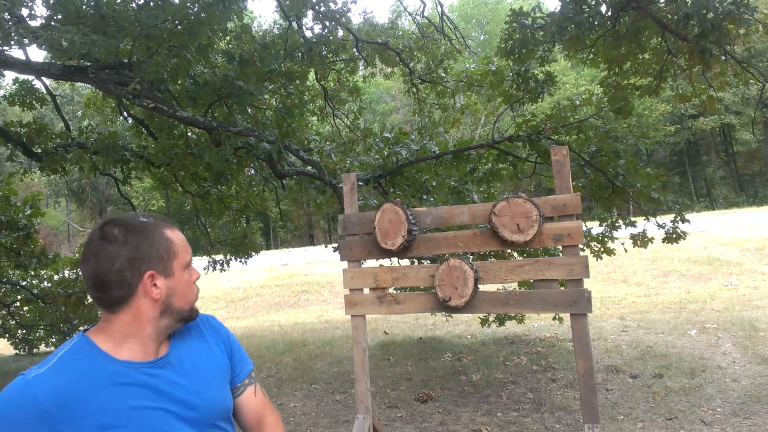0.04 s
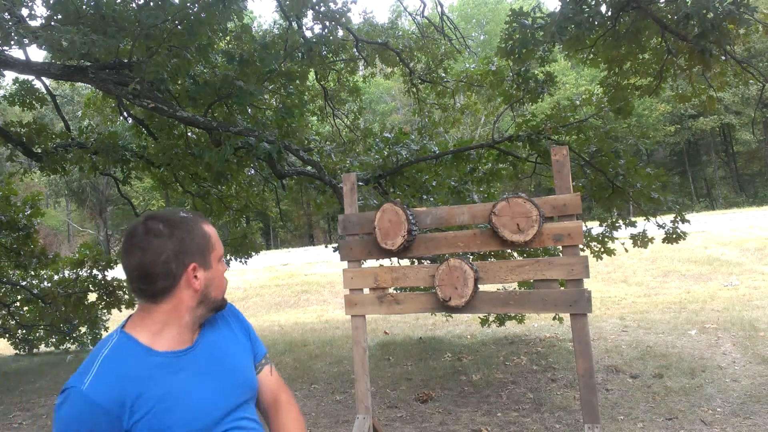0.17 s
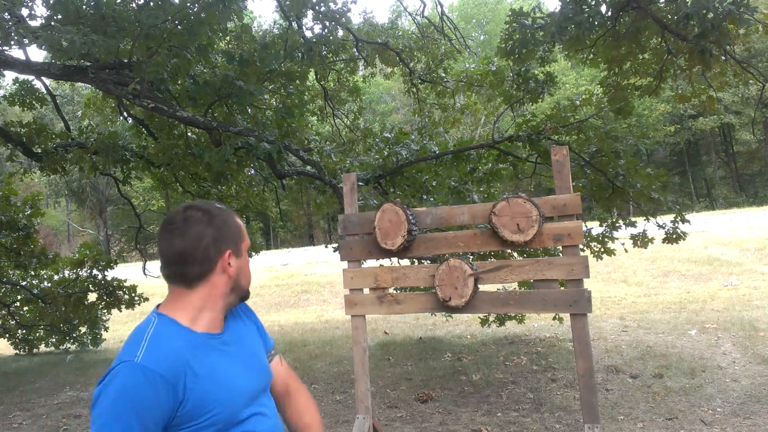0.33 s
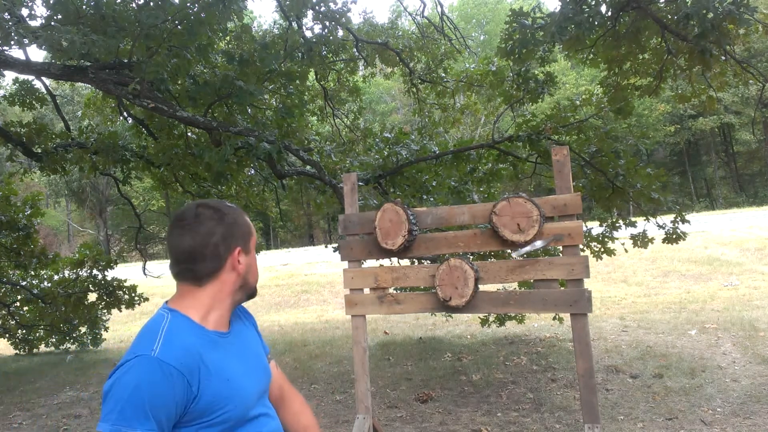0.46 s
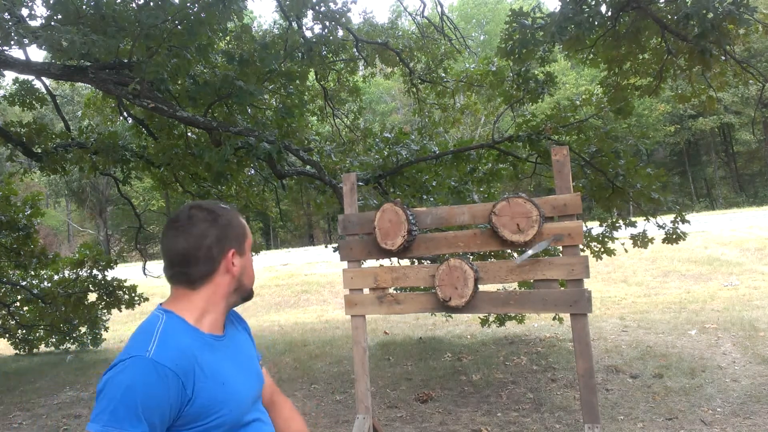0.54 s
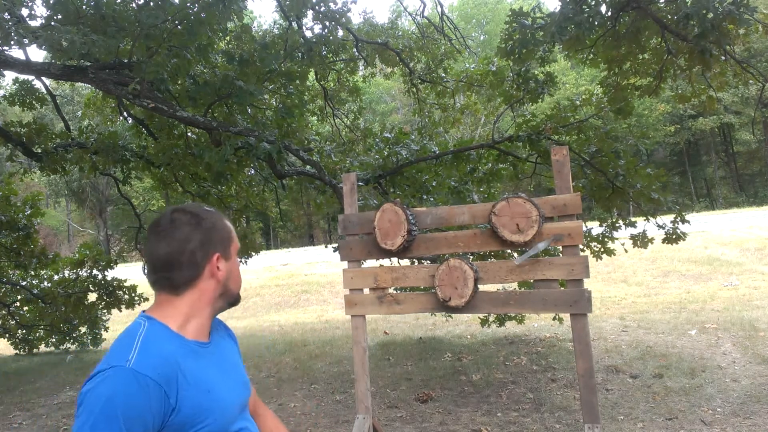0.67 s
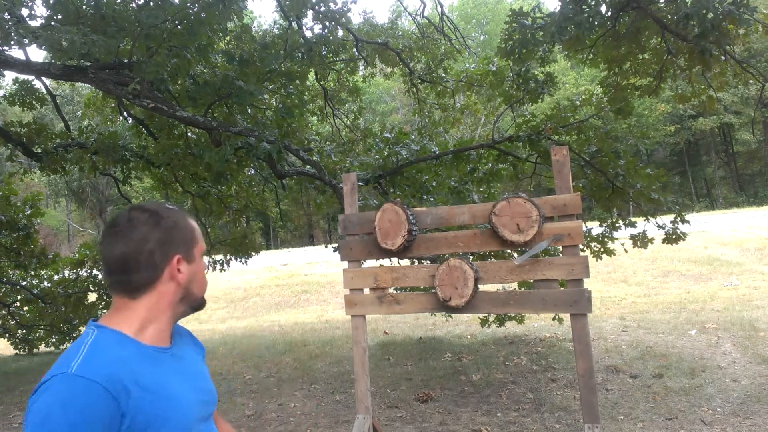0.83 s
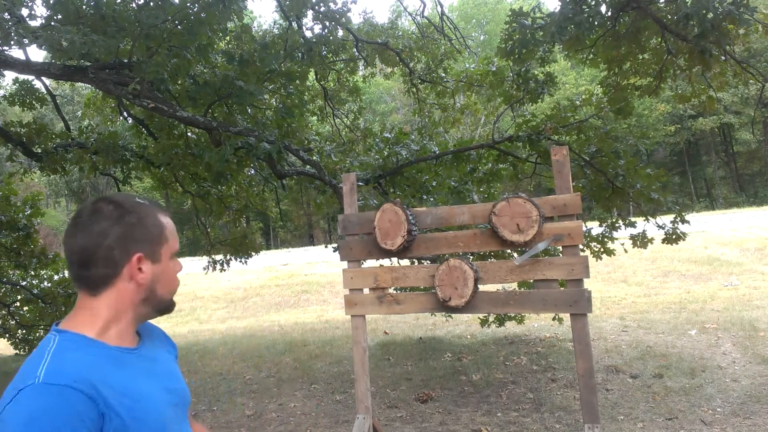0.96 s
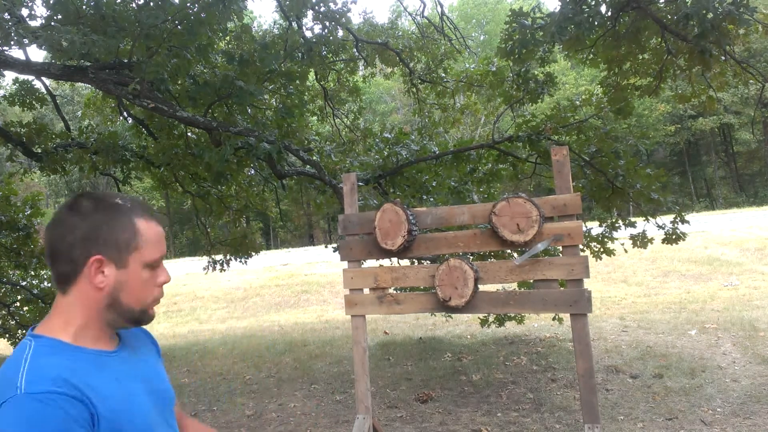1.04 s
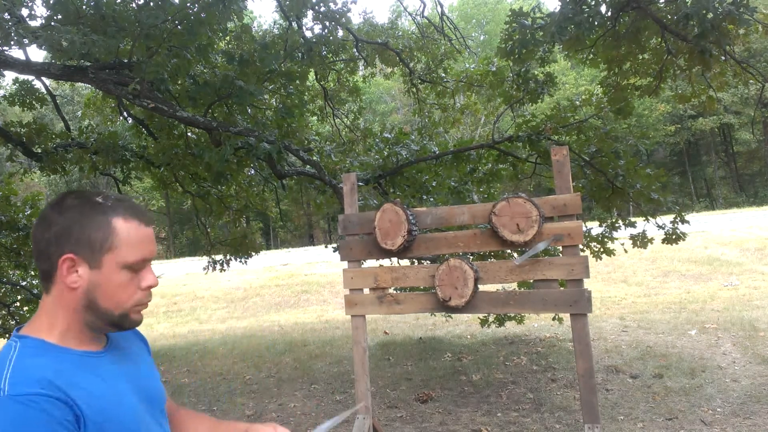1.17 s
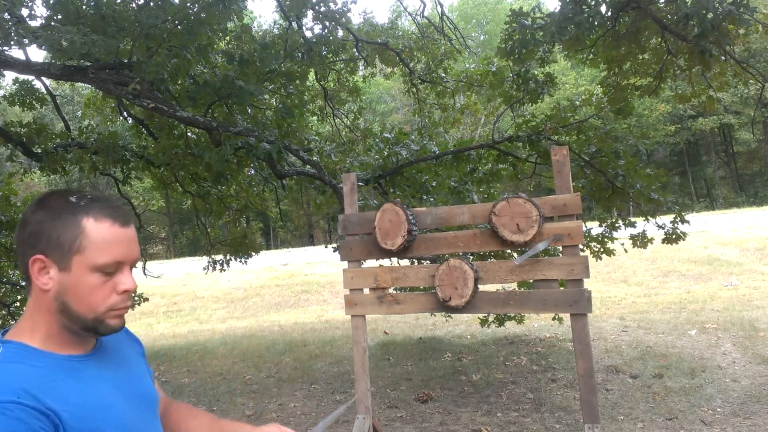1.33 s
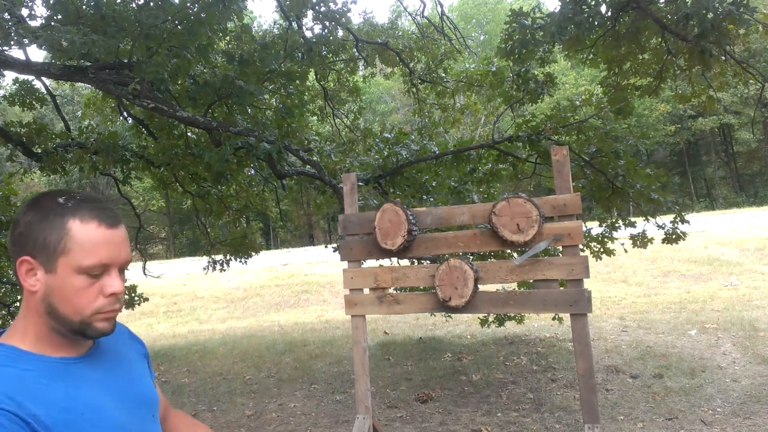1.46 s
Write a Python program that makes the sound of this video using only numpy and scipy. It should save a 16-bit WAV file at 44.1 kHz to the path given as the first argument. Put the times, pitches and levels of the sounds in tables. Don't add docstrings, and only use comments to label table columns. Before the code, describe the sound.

Outdoors in a quiet clearing, a steel knife bites into boards with a sharp woody crack, faint quiver and dull echo from trees. After a tiny handle tick, a blade scrapes against others close up, ringing briefly.

```python
import sys
import numpy as np
from scipy import signal
from scipy.fft import rfft, irfft
from scipy.io import wavfile
from scipy.ndimage import uniform_filter1d

SR = 44100
rng = np.random.default_rng(int(sys.argv[2]) if len(sys.argv) > 2 else 0)


def elevation(decibels):
    levels = np.asarray(decibels, float)
    return 10 ** (levels / 20)


def file_out(sig):
    cols = np.atleast_2d(sig).T
    lim = np.clip(cols, -1, 1)
    pcm = np.round(lim * 32767).astype(np.int16)
    wavfile.write(sys.argv[1], SR, pcm)


N = 66150
t = np.arange(N) / SR

# [f/Hz, level/dB]
AIR_COLOUR = [(45, -13), (90, -2), (250, -7), (800, -14.5), (2500, -18), (4700, -14), (6300, -19),
              (8000, -37)]
AIR_DB = -65
# [f/Hz, level/dB]
CLOTH_STIR = [(0, -61), (.1, -66.5), (.2, -83), (.36, -63.5), (.41, -56.5), (.5, -72.5), (.65, -91.5),
              (.72, -66.5), (.85, -65.5), (1.05, -66), (1.18, -74), (1.5, -87.5)]
CLOTH_COLOUR = [(1000, -1), (4000, 0.5), (7000, -3), (10500, -7)]
# [t/s, level/dB]
MOTOR_COLOUR = [(50, -21.5), (80, 2), (130, -13), (200, -23), (240, -6.5), (300, -33)]
MOTOR_PASSING = [
    (0, -91.5),
    (.6, -84),
    (1., -65.5),
    (1.3, -77),
    (1.5, -80),
]
# [t/s, f/Hz, level/dB, t60/s, lag/rad]
ARM_BUMP = (-0.5, 69, -60, 0.57, 3.43)
# [f/Hz, level/dB, t60/s, right-port lag/rad, swell/s]
EARLIER_RING = [(4404, -55.5, 0.091, 3.1, .003), (3987, -54.5, 0.2, 1.5, 0.038),
                (7660, -55, 0.44, .5, 0.11), (8106, -60.5, 0.093, 0.67, 0.0061),
                (9220, -65.5, 0.5, 1.3, 0.0033), (860, -53, 0.0555, 1.64, 0.00477),
                (3670, -61.5, .2, 1.2, .04), (5840, -64.5, .4, 1.1, .08), (2760, -58.5, 0.074, 1.6, 0.0068)]

HIT_S = .2250
# [delay/s, level/dB]
BLOWS = [
    (.0016, -10),
    (.0030, -1.5),
    (.0056, 1),
    (.0082, -5),
    (0.0113, -5.5),
    (0.019, -13.5),
    (.0365, -9),
    (0.044, -10),
]
SOFTER_DB = 72.5
# [f/Hz, level/dB, t60/s,
# lag/rad]
TARGET_MODES = [(121.5, -49, 0.27, 2.2), (247.8, -23, 0.034, 2.69), (321.3, -15, 0.03, 3.094),
                (460, -34.5, 0.31, 2.63), (602.8, -30.5, 0.097, 2.394), (750, -23.5, 0.023, 3.267),
                (982, -27, 0.019, 2.3), (1215, -24, 0.0978, 1.56), (1426.5, -20, 0.052, 2.2),
                (1761, -14.5, 0.0261, 1.712), (2079, -17.5, 0.044, 2.407), (2398.6, -20, 0.07, 2.126),
                (2947, -29, 0.04, 3.7), (3332.3, -17, 0.03, 1.3), (3920, -28.5, 0.017, 0.86),
                (4137, -21.5, 0.032, 0.72), (4534, -9.5, 0.025, 0.35), (81.3, -45.5, .12, .9)]
TIP_IN_GRAIN = [(7229, -49.5, 0.033, -0.77), (8684, -40, 0.015, -0.68), (9630, -47, 0.02, -1.2),
                (5806, -49, 0.042, 1.5)]
STUCK_KNIFE = [(1210, -52.5, 1, 2.137), (1611.6, -53, 0.685, 1.2), (1790.5, -53.5, 0.58, 1.9),
               (2440, -48, 0.31, 2.4), (3431.7, -52, 0.766, .8), (4580, -46, 0.3, 1.9),
               (3360, -49, 0.15, 1.1)]
QUIVER_DB, QUIVER_RAD = 4, 1.1
# [f/Hz, t60/s]
NEAR_COLOUR = [(80, -27.5), (350, 1.5), (1200, -1), (2400, -3), (3900, -10.5), (4600, -13), (6500, -20.5),
               (10500, -27)]
NEAR_T60 = [(100, 0.38), (400, 0.245), (1000, 0.2183), (4000, 0.1884), (10000, 0.25)]
NEAR_DB, NEAR_RISE_S = -21, 0.0018
# [f/Hz, t60/s]
WOODS_COLOUR = [(80, -11), (400, -15.5), (1200, -5.5), (1700, -2), (2400, -6), (3400, -5), (5000, -13.5),
                (7000, -32.5), (10500, -43.5)]
WOODS_T60 = [(100, 0.96), (1500, 1.491), (4000, 0.65), (10000, .5)]
WOODS_DB, WOODS_RISE_S = -46.5, 0.032
LOW_CUT_HZ = 70

# [f/Hz, level/dB]
TICK_COLOUR = [(600, -8), (1100, -7), (3100, -5.5), (4500, 4), (6000, -3.5), (8500, -3.5), (10500, -4.5)]
TICK_S, TICK_DB = .7265, -48.5

# [t/s, level/dB]
DRAW_PRESSURE = [
    (.80, -40.5),
    (.876, -17),
    (.889, 0.5),
    (.903, 2.5),
    (.925, -2),
    (.94, -16.5),
    (.97, -21.5),
    (1.03, -25),
    (1.1, -41.5),
]
# [f/Hz, level/dB]
GRIT_COLOUR = [(1400, -39.5), (1900, -7.5), (3000, 2), (4600, 0), (6000, 3.5), (7500, 0), (9300, 3),
               (10600, -9)]
GRIT_DB, GRIT_DULL_S = -42.5, 0.00558
# [f/Hz, level/dB, t60/s, lag/rad]
OTHER_KNIVES = [(2340, -88, 0.026, -2.5), (3253.5, -87.5, 0.017, -1.05), (4174, -72.5, 0.048, 1.34),
                (5376, -74, 0.033, 1.5), (6140, -66.5, 0.046, 3.5), (8044, -71, 0.046, 0),
                (8420, -73.5, 0.03, -0.02), (9210, -73.5, 0.039, -1.25), (10082, -68, 0.042, -1.5)]
# [f/Hz, draw level/dB, brush level/dB, t60/s, lag/rad, sway phase/rad]
DRAWN_KNIFE = [(1289, -82.5, -66.5, .4, -1.5, 2), (1877.3, -48.5, -90.5, 0.066, -2, 1),
               (2003, -73.5, -76, 0.54, -2.01, 0.35), (2902.6, -55, -43.5, 0.2253, 0.6429, 4.5),
               (3740.4, -50.5, -74.5, 0.089, 1.1, 0.2), (4020, -66.5, -60, 0.23, 7.5, 0.78),
               (4363.7, -53.5, -46, 0.34, 1.5, 0.23), (4904, -53, -65.5, 0.191, 4, 1.62),
               (5080, -57.5, -63, 0.31, 4.5, 5.5), (6587, -49.5, -70.5, 0.2768, 4.5, -0.06),
               (7332, -63, -68.5, 0.31, 5, 1.76), (8134, -48.5, -61.5, .22, 3, 2.5),
               (9017, -52.5, -58.5, 0.17, 0.5, -2), (9792, -54.5, -52, 0.19, -1.5, -1.07),
               (4255, -56, -66, 0.11, -2.5, .3), (5980, -65.5, -59, .12, 8, 1.1),
               (6260, -59, -77.5, .12, 4.5, .4), (7650, -63, -77.5, .12, -1.98, 2.4),
               (9292, -60.5, -75, 0.089, -6.77, 1.3), (10340, -56, -78.5, 0.14, 2.22, .6)]
ROUGH = .012
BRUSH_S, BRUSH_RISE_S, BRUSH_FALL_S = 1.010, 0.00731, 0.0052
# [f/Hz, split/Hz]
MODE_SPLIT = [(2904, 6), (4362, 27), (5066, 22), (6590, 14.5), (8110, 25), (9049, 18), (9792, 30)]
SWAY_DEPTH, PORT_SWAY_RAD = .85, .3
# [f/Hz, loss/dB]
FINGER_GRIP = [(3000, -0.27), (4030, -2.5), (4362, 24.5), (5066, 5.5), (6590, 2), (7332, 10), (9049, 8),
               (9792, 8)]
GRIP_S = 1.02
# [t/s, f/Hz, level/dB, t60/s, lag/rad]
EDGE_NICKS = [
    (0.8712, 2830, -53, 0.075, 1.07),
    (0.8902, 9230, -32.5, 0.062, 2.63),
    (0.8994, 9390, -34.5, 0.033, -1.14),
    (0.8998, 9860, -32.5, 0.025, 1.26),
    (0.908, 6500, -32, 0.042, 6.5),
    (0.918, 4900, -28, 0.039, -6),
    (.922, 2900, -35.5, 0.076, 0.54),
    (.927, 3780, -38, 0.0765, 0.68),
    (.938, 8100, -54, .08, -1.4),
]

# [f/Hz, correlation]
LIKE_HIT = [(60, -.1), (260, -.9), (700, -.75), (2400, -.3), (5000, .1), (8500, .5)]
LIKE_AIR = [(60, -0.45), (260, -.3), (1000, 0.09), (8000, -0.03)]
LIKE_TICK = [(100, 0.43), (8000, 0.41)]
# [f/Hz, level/dB]
NEAR_PORTS = [(60, 0), (400, 1.8453), (2400, -3), (3500, 4.5), (4800, 9.5), (6200, 5), (7200, -10),
              (10500, -5.5)]
AIR_PORTS = [(100, 3.0), (500, -3.5), (2500, -1.0), (4800, 8.0), (7500, 5.5), (10000, 6.0)]
TOP_HZ = 10620


def on_hz(table, hz):
    f, value = np.array(table).T
    return np.interp(np.log(hz + 1), np.log(f), value)


def on_t(table):
    return np.interp(t, *np.array(table).T)


def walk(rate):
    k = int(SR / rate)
    steps = np.repeat(rng.standard_normal(N // k + 1), k)
    return 1.64 * uniform_filter1d(uniform_filter1d(steps, k), k)[:N]


def bands(colour, like, shape, grain_db=0.):
    hz = np.fft.rfftfreq(N, 1 / SR)
    raw = rng.standard_normal((2, N)) * elevation(grain_db * rng.exponential(size=N))
    c = np.clip(on_hz(like, hz), -1, 1)
    mid, side = rfft(raw) * elevation(on_hz(colour, hz)) * np.sqrt([1 + c, 1 - c])
    spec = np.array([mid + side, mid - side])
    spec = spec * N / np.sqrt(2 * np.sum(np.abs(spec[0]) ** 2))
    place = 2 * np.log2(hz / 30 + 1e-9)
    first = int(2 * np.log2(colour[0][0] / 30))
    last = min(int(2 * np.log2(colour[-1][0] / 30)) + 2, 18)
    out = 0
    for k in range(first, last):
        band = irfft(spec * np.clip(1 - np.abs(place - k), 0, 1), N)
        out = out + band * shape(30 * 2 ** (k / 2))
    return out


def ring(drive, hz, db, t60, lag, wobble=0):
    pole = np.exp(2j * np.pi * hz / SR - np.log(1000) / (t60 * SR))
    z = signal.lfilter([1], [1, -pole], drive) * np.exp(1j * wobble)
    return elevation(db) * np.array([z.imag, (z * np.exp(1j * lag)).imag])


def fade(start, rise, t60):
    u = np.clip(t - start, 0, None)
    return (1 - np.exp(-u / rise)) * elevation(-60 * u / t60)


def clearing_air():
    swell = walk(1.1)
    return elevation(AIR_DB) * bands(AIR_COLOUR, LIKE_AIR, lambda hz: elevation(0.38 * swell + 1.1 * walk(8.7)))


def stirring_cloth():
    return bands(CLOTH_COLOUR, LIKE_AIR, lambda hz: elevation(on_t(CLOTH_STIR) + 0.8 * walk(35)), grain_db=2.5)


def far_motor():
    return bands(MOTOR_COLOUR, LIKE_TICK, lambda hz: elevation(on_t(MOTOR_PASSING) + 2.5 * walk(11)))


def arm_bump():
    start, *mode = ARM_BUMP
    return ring(fade(start, .004, .05) / 300, *mode)


def earlier_ring():
    first = (np.arange(N) == 0) * 1.
    out = 0
    for *mode, swell in EARLIER_RING:
        tone = ring(first, *mode, wobble=0.55 * walk(50))
        out = out + tone * (1 - np.exp(-t / swell)) * elevation(3.5 * walk(30))
    return out


def tip_piercing():
    out = 0
    for mode in TIP_IN_GRAIN:
        rough = rng.standard_normal(N) + 3.475 * np.cos(2 * np.pi * mode[0] * t)
        out = out + ring(0.3576 * fade(HIT_S, .0001, 0.00353) * rough, *mode)
    return out


def planks_and_blade():
    delay, db = np.array(BLOWS).T
    at = ((HIT_S + delay) * SR).astype(int)
    out = 0
    for mode in TARGET_MODES:
        phase = np.exp(2j * np.pi * rng.random(len(at)))
        force = np.zeros(N, complex)
        force[at] = elevation(db - SOFTER_DB * delay * mode[0] / 1000) * phase
        force = uniform_filter1d(force.real, size=7) + 1j * uniform_filter1d(force.imag, size=7)
        out = out + ring(force, *mode)
    return out


def quivering_knife():
    strike = 1. * (np.arange(N) == int((HIT_S + BLOWS[1][0]) * SR))
    out = 0
    for mode in STUCK_KNIFE:
        tone = ring(strike, *mode, wobble=QUIVER_RAD * walk(60))
        out = out + tone * elevation(QUIVER_DB * np.array([walk(40), walk(40)]))
    return out


def near_scatter():
    def decay(hz):
        return fade(HIT_S, NEAR_RISE_S, on_hz(NEAR_T60, hz)) * elevation(1.2 * walk(90))
    return elevation(NEAR_DB) * bands(NEAR_COLOUR, LIKE_HIT, decay, grain_db=2.0)


def woods_echo():
    def decay(hz):
        return fade(HIT_S, WOODS_RISE_S, on_hz(WOODS_T60, hz)) * elevation(2.3 * walk(25))
    return elevation(WOODS_DB) * bands(WOODS_COLOUR, LIKE_AIR, decay)


def hit():
    whole = planks_and_blade() + tip_piercing() + quivering_knife() + near_scatter() + woods_echo()
    return signal.sosfilt(signal.butter(2, LOW_CUT_HZ, "high", fs=SR, output="sos"), whole)


def handle_tick():
    return elevation(TICK_DB) * bands(TICK_COLOUR, LIKE_TICK, lambda hz: fade(TICK_S, .0002, .012 + 10 / hz))


def pressure_db(hz):
    return np.interp(t - GRIT_DULL_S * np.log2(10000 / hz), t, on_t(DRAW_PRESSURE))


def scraping_grit():
    def scrape(hz):
        return elevation(pressure_db(hz) + 2.3 * walk(210))
    return elevation(GRIT_DB) * bands(GRIT_COLOUR, LIKE_AIR, scrape, grain_db=3.0)


def other_knives():
    out = 0
    for mode in OTHER_KNIVES:
        force = elevation(pressure_db(mode[0]) + 2 * walk(200)) * rng.standard_normal(N)
        out = out + ring(force, *mode)
    return out


def sliding_blade():
    u = t - BRUSH_S
    brush = np.where(u < 0, np.exp(-(u / BRUSH_RISE_S) ** 2), np.exp(-np.abs(u) / BRUSH_FALL_S))
    closing = np.clip((t - GRIP_S) / 0.007, 0, 1)
    port_phase = np.array([[0], [PORT_SWAY_RAD]])
    out = 0
    for hz, db, brush_db, t60, lag, sway in DRAWN_KNIFE:
        steady = np.exp(2j * np.pi * (hz * t + rng.random()))
        scrape = elevation(db + pressure_db(hz)) * (0.001471 * steady + ROUGH * rng.standard_normal(N))
        force = scrape + elevation(brush_db) * 0.001874 * brush * steady
        angle = 2 * np.pi * on_hz(MODE_SPLIT, hz) * (t - .93) + sway + port_phase
        beat = 1 + SWAY_DEPTH * min(hz / 6500, 1) * np.cos(angle)
        out = out + ring(force, hz, 0, t60, lag) * beat * elevation(-on_hz(FINGER_GRIP, hz) * closing)
    return out


def catching_nicks():
    out = 0
    for start, *mode in EDGE_NICKS:
        burst = fade(start, 0.00095, 0.01945) * np.exp(2j * np.pi * mode[0] * t) / 100
        out = out + ring(burst, *mode)
    return out


def drawn_knife():
    whole = scraping_grit() + other_knives() + sliding_blade() + catching_nicks()
    return signal.sosfilt(signal.butter(4, 1150, "high", fs=SR, output="sos"), whole)


def scene():
    air, cloth, motor = clearing_air(), stirring_cloth(), far_motor()
    near = cloth + hit() + drawn_knife() + handle_tick() + arm_bump() + earlier_ring()
    hz = np.fft.rfftfreq(N, 1 / SR)
    halves = np.array([[.5], [-.5]])
    near_spec = rfft(near) * elevation(on_hz(NEAR_PORTS, hz) * halves)
    air_spec = rfft(air + motor) * elevation(on_hz(AIR_PORTS, hz) * halves)
    return irfft(near_spec + air_spec, N)


def band_limit(x):
    return signal.sosfilt(signal.butter(12, 11210, fs=SR, output="sos"), x)


def record(dry):
    mix = signal.sosfilt(signal.ellip(10, .3, 75, TOP_HZ, fs=SR, output="sos"), dry)
    return band_limit(mix)


dry = scene()
out = record(dry)
file_out(out)
```